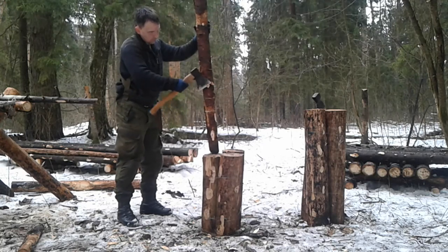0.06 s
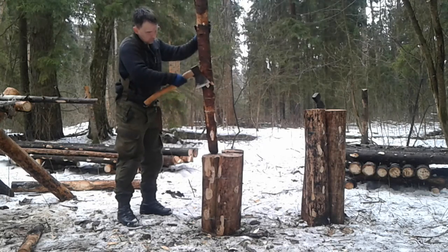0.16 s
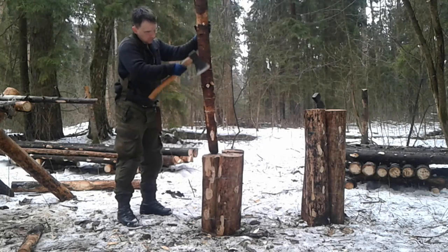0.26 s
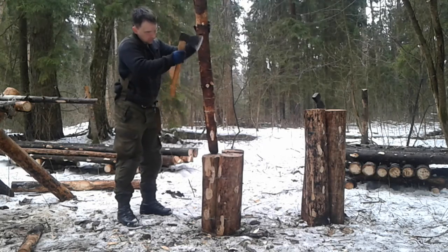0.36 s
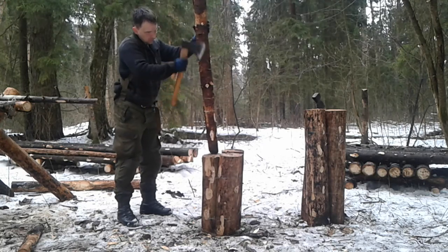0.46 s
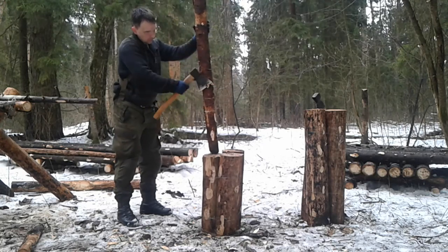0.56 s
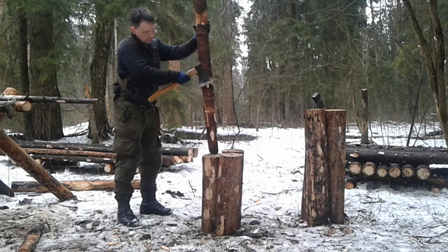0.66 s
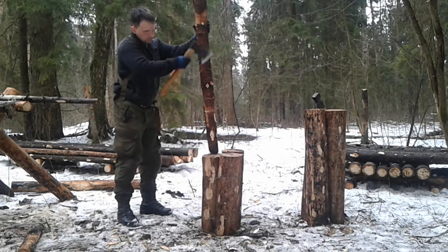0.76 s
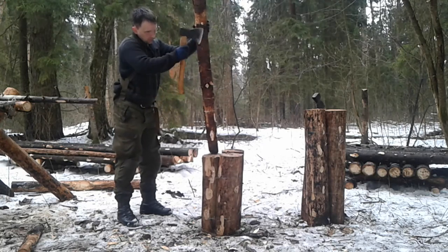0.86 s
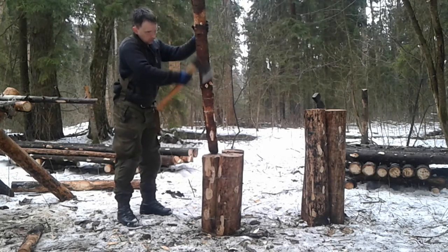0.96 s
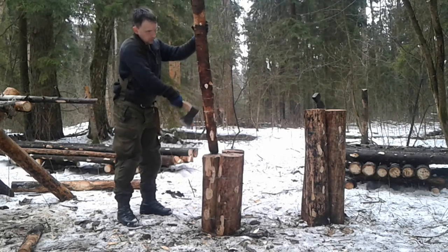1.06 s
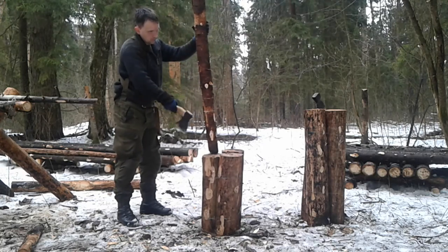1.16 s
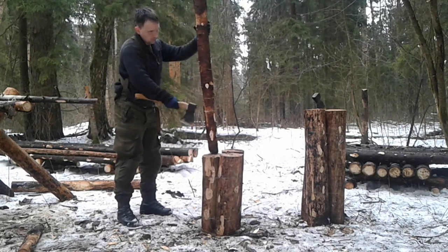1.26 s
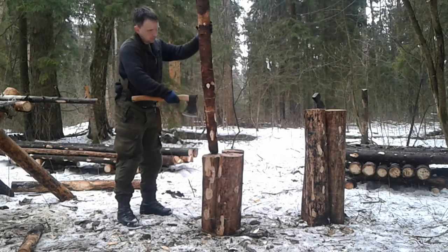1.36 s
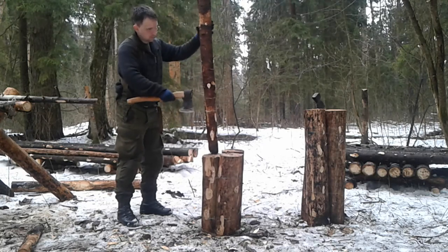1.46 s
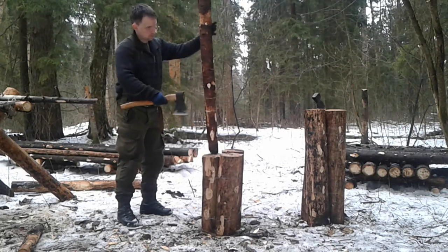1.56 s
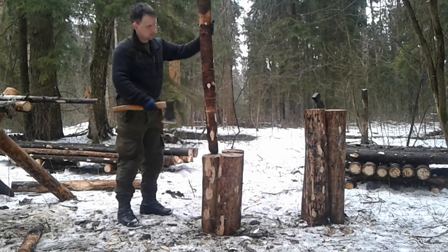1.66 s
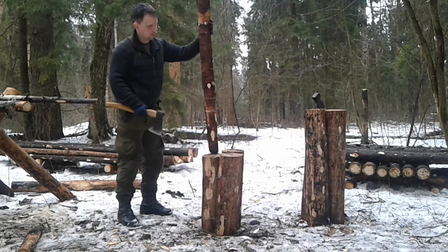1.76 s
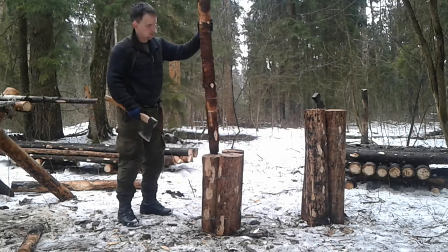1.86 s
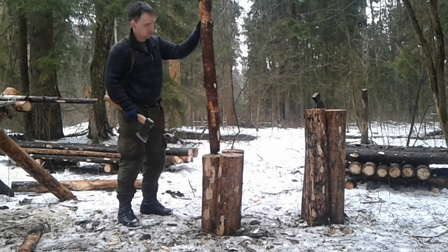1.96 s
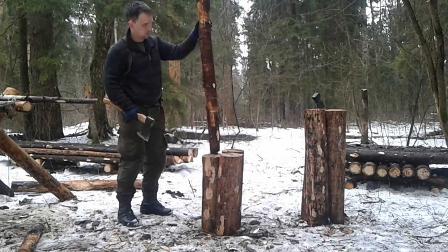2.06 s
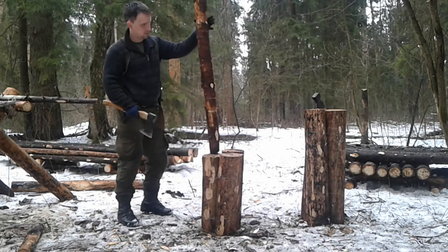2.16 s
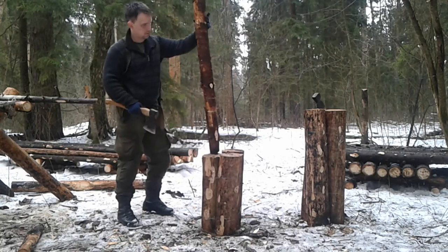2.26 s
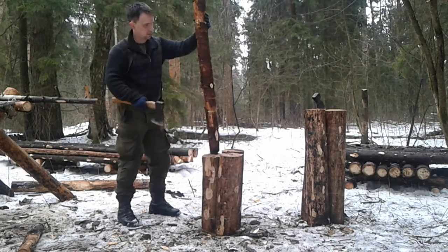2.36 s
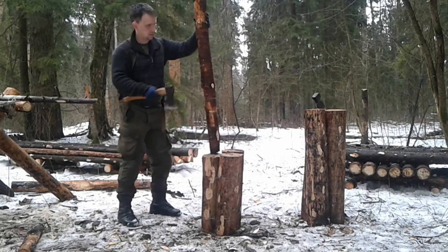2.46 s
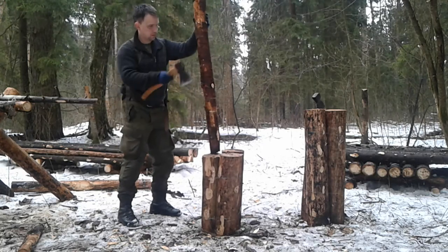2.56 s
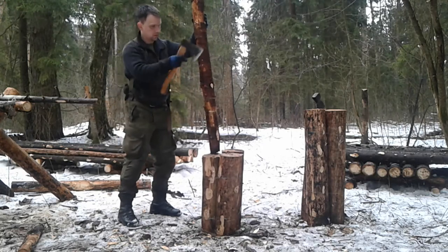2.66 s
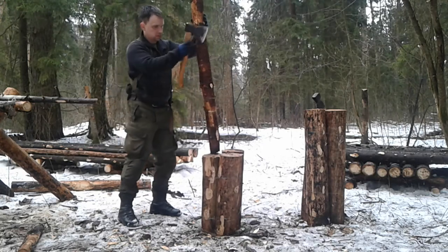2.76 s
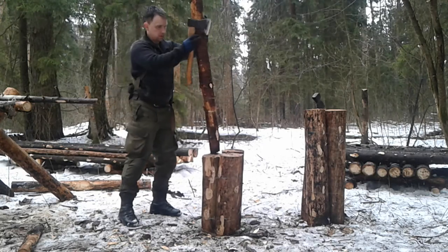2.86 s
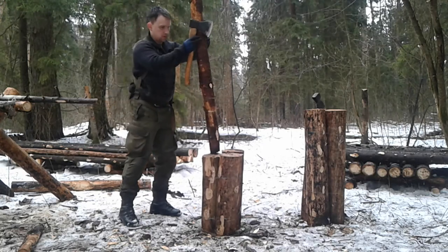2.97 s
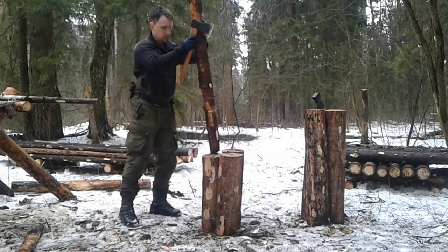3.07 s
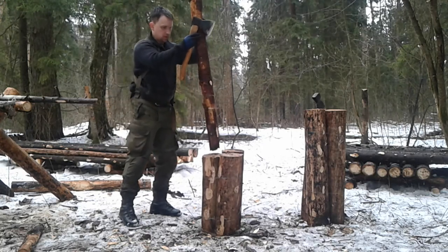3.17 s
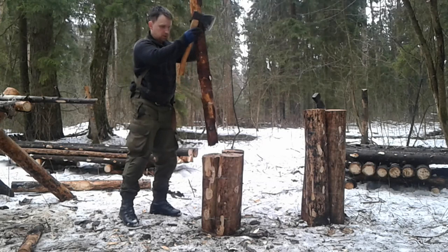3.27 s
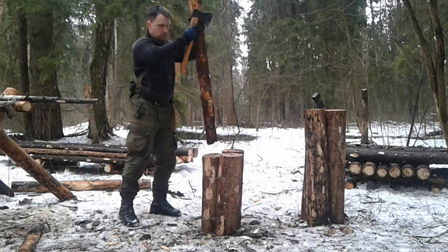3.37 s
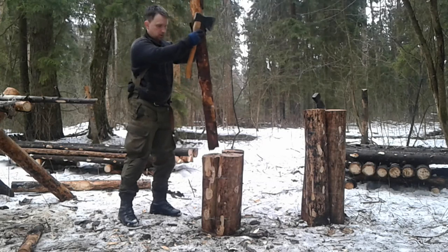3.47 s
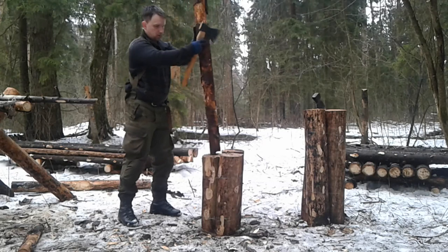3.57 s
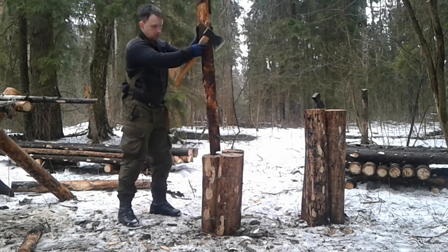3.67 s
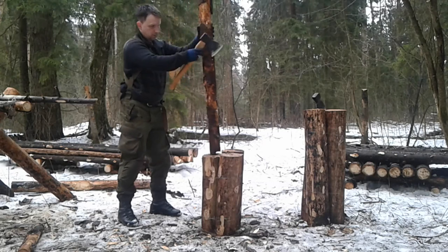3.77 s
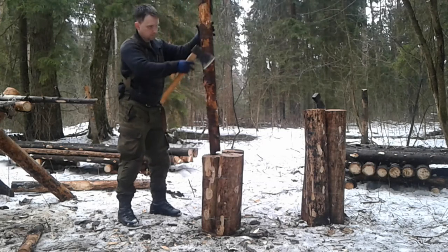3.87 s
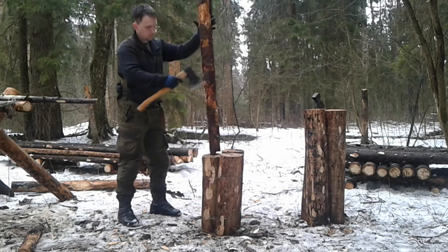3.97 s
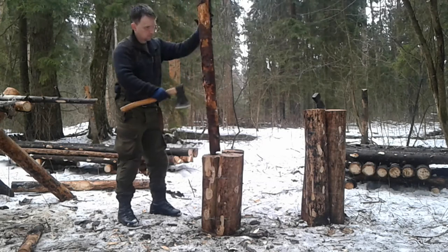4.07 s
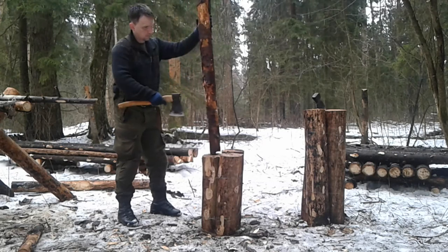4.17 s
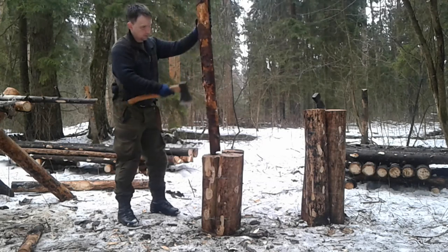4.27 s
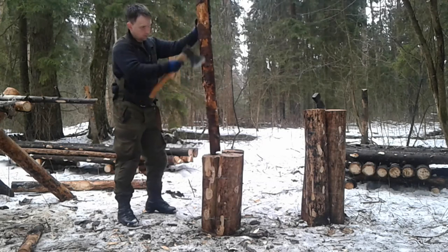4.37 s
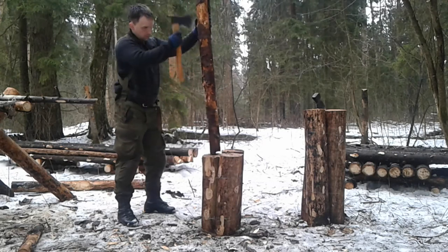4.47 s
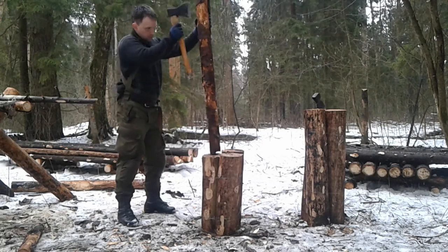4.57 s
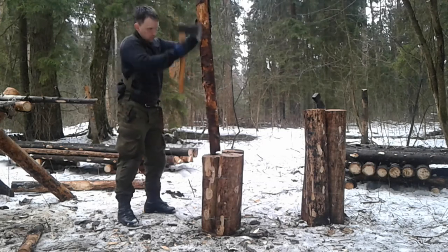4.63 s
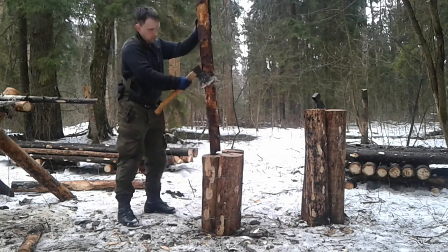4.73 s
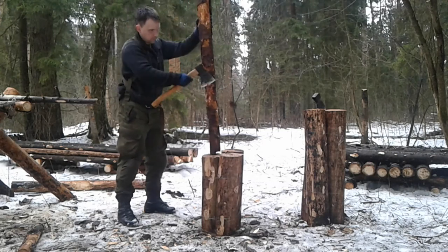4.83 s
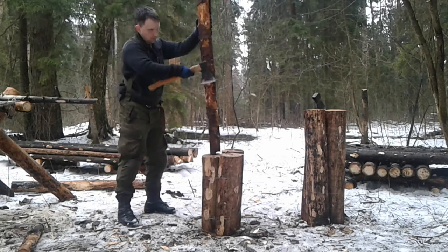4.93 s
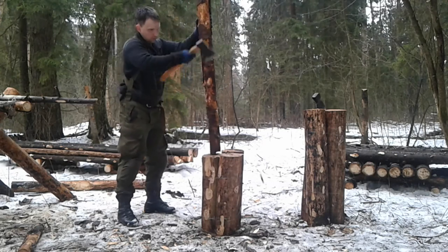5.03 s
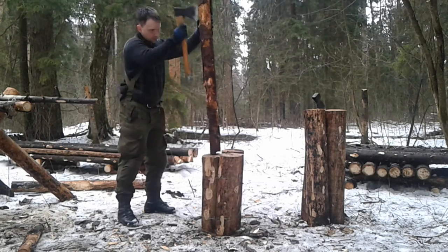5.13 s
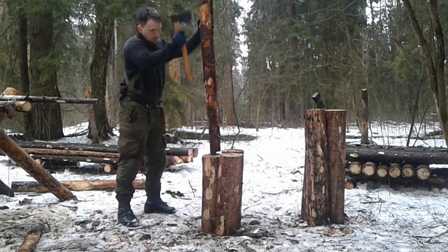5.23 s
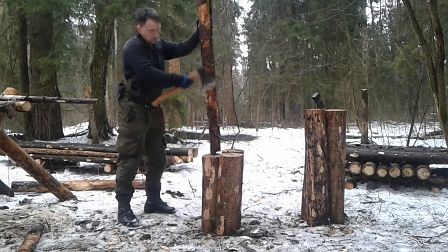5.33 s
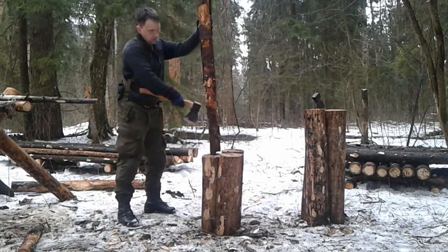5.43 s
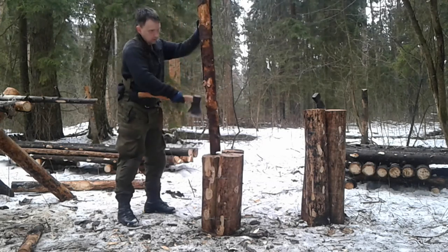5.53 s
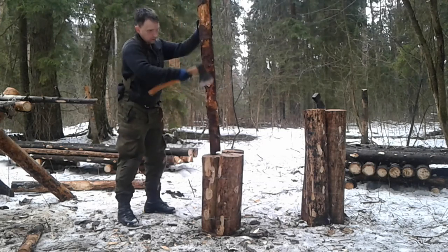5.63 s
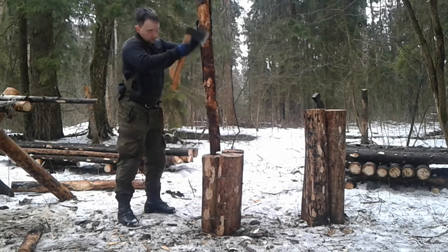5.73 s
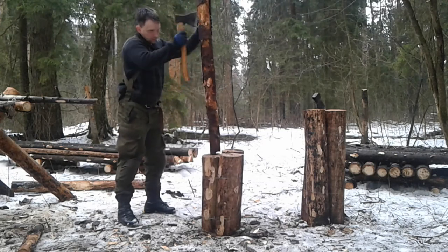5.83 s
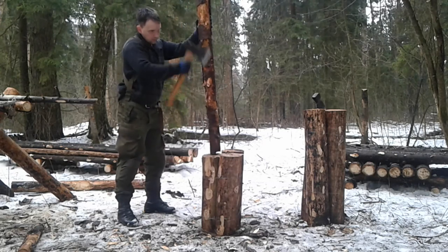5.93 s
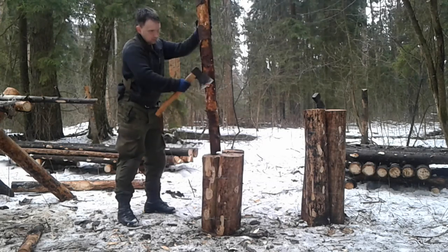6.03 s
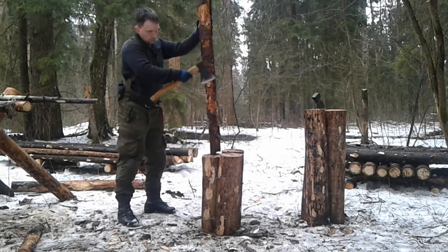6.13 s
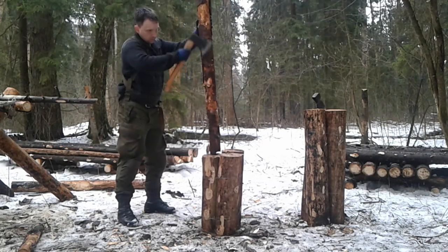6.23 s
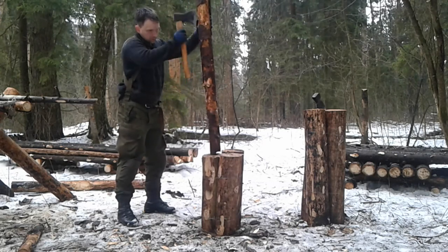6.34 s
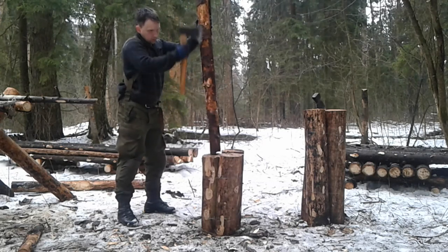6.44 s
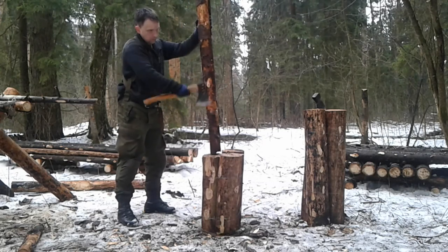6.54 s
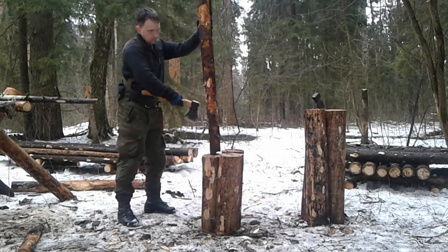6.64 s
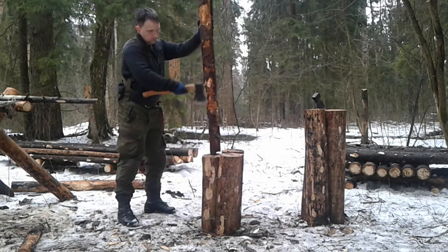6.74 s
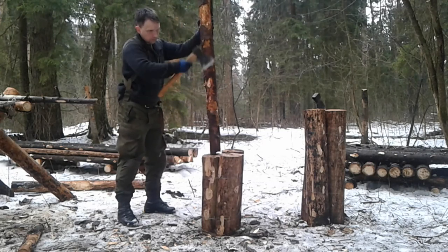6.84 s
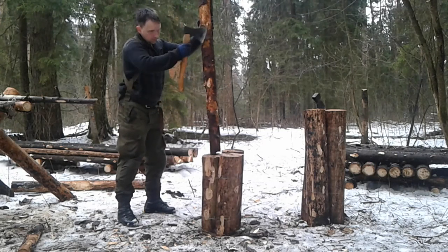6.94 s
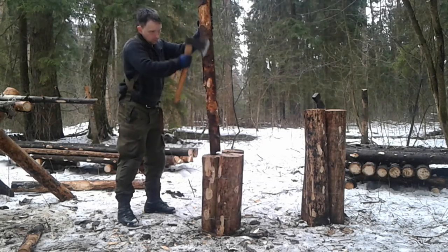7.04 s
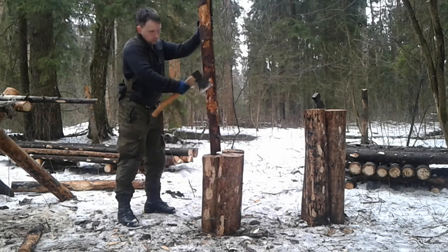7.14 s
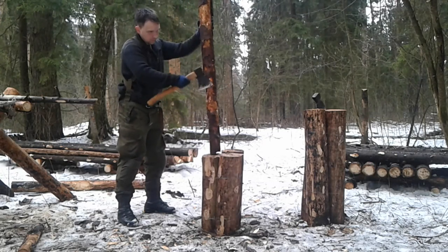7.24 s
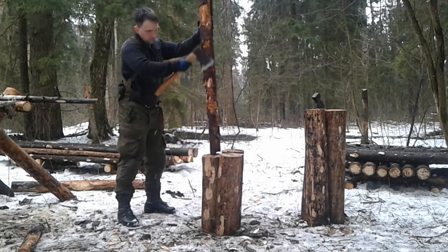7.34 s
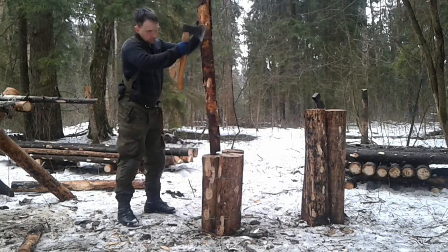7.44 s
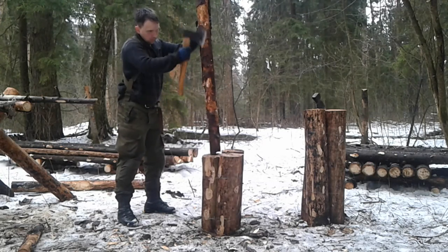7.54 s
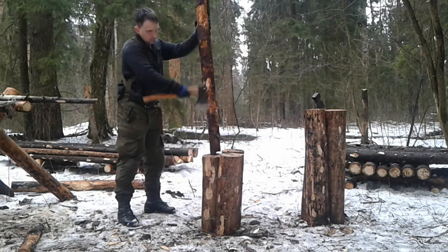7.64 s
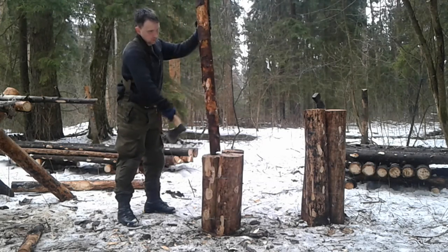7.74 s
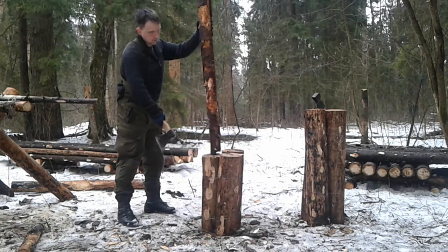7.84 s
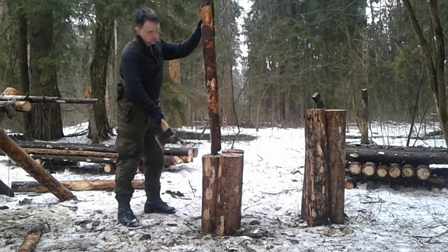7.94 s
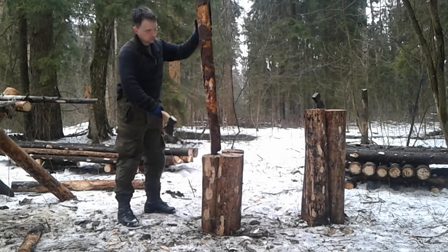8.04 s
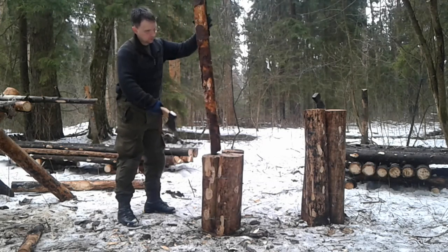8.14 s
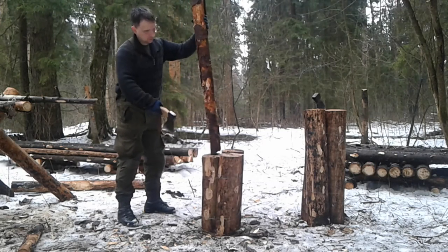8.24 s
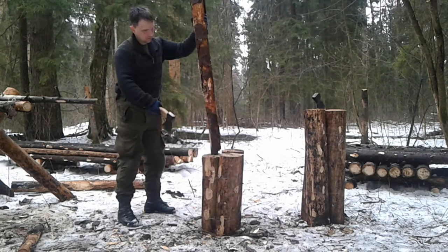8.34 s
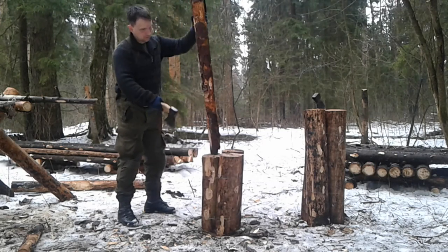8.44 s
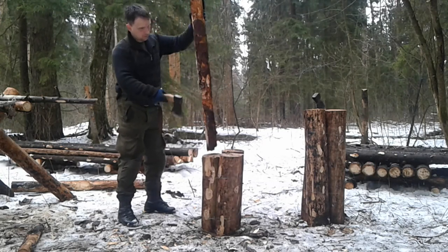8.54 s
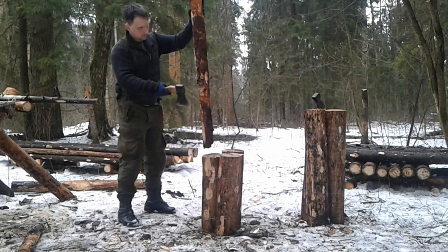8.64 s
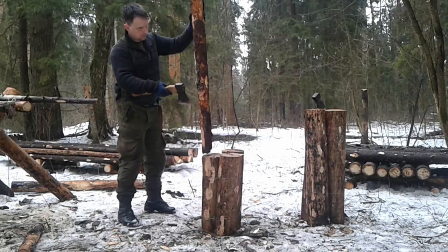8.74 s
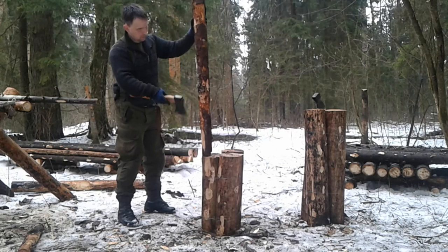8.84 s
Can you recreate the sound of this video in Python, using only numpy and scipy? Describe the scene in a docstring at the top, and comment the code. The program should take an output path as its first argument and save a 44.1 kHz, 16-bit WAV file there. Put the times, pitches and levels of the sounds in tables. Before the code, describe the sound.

Crisp axe chops into a standing log, three blows, a pause with a soft bump, then a quicker run with high metallic ringing and falling chips.

```python
"""A snowy forest: an axe hews an upright wooden pole in front of the microphone.
Each blow tears fibres (cracks through resonances), knocks the pole (struck modes) and sets the steel
head singing (damped modes and one long bending tone); the trunks scatter it back as a noise tail.
Chips patter down, cloth rustles, the pole bumps on its block once, the blade drags free in two tugs,
and a far steady rush of shaped noise lies under it all."""
import sys
import numpy as np
from scipy import signal
from scipy.fft import rfft, irfft, next_fast_len
from scipy.io import wavfile
from scipy.ndimage import uniform_filter1d, map_coordinates

SR = 44100
rng = np.random.default_rng(int(sys.argv[2]) if len(sys.argv) > 2 else 0)


def master(y):
    """Save y as 16-bit WAV."""
    cut = np.clip(np.atleast_2d(y).T, -1, 1)
    pcm = np.round(cut * 32767)  # scale
    wavfile.write(sys.argv[1], SR, pcm.astype(np.int16))


N = 392490
T = np.arange(N) / SR


def amp(db):
    """Amplitude factor of a level in dB."""
    return 10 ** (np.asarray(db) / 20)


def unit(x):
    """x scaled to rms 1."""
    return x / np.sqrt(np.mean(x ** 2) + 1e-20)


def along(points, hz):
    """Value at hz, read between (Hz, value) points on a log axis."""
    f, v = np.transpose(points)
    return np.interp(np.log(hz + 1), np.log(f + 1), v)


def level(rows):
    """Gain per sample from (s, dB) rows, silent outside them."""
    s, db = np.transpose(rows)
    return amp(np.interp(T, s, db, left=-200, right=-200))


def filtered(x, response):
    """x times a complex response of frequency."""
    m = next_fast_len(x.shape[-1] + 4096)
    spectrum = rfft(x, m) * response(np.fft.rfftfreq(m, 1 / SR))
    return irfft(spectrum, m)[..., :x.shape[-1]]


def resonances(modes):
    """Causal response of (Hz, width Hz, dB) resonances, added with alternating sign."""
    def response(f):
        return sum((-1) ** k * amp(db) * 1j * f * width / (hz * hz - f * f + 1j * f * width)
                   for k, (hz, width, db) in enumerate(modes))
    return response


def snaps(size, spread_db):
    """Dense tiny cracks of uneven size, rms 1."""
    return unit(rng.standard_normal(size) * amp(spread_db * rng.standard_normal(size)))


def clumps(rate, depth_db):
    """Gain of rms 1 that wanders between random levels, rate of them a second."""
    steps = rng.standard_normal(int(N / SR * rate) + 4)
    return unit(amp(depth_db * map_coordinates(steps, [T * rate])))


def gesture(s, rise, hold, fall_db, db):
    """Gain that rises, holds, then falls by fall_db a second."""
    past_hold = np.maximum(T - s - rise - hold, 0)
    return amp(db - fall_db * past_hold) * np.clip((T - s) / rise, 0, 1) ** 2


def ringing(modes, t, attack, scatter_db):
    """Damped (Hz, dB, t60 s) modes, each at a new strength."""
    t = np.maximum(t, 0)
    ring = sum(amp(db + scatter_db * rng.normal() - 60 * t / t60) * np.sin(2 * np.pi * hz * t)
               for hz, db, t60 in modes)
    return (1 - np.exp(-t / attack)) * ring


def add(track, s, x):
    """Mix x into the track at s seconds."""
    part = track[round(s * SR):][:len(x)]
    part += x[:len(part)]


# The far rush over time. Each row: time in seconds, level in dB rms.
RUSH_LEVEL = [(0.0, -57), (1.16, -56), (1.61, -57.5), (4.24, -57), (4.93, -55.5), (8.01, -55.5), (8.9, -57)]
# Its spectrum at the microphone. Each row: frequency in Hz, relative level in dB.
RUSH_SPECTRUM = [(20, -18.5), (35, -5.5), (60, 3.5), (86, -1), (237, -6.5), (300, -7), (660, -5),
                 (1100, -12.5), (2130, -24.5), (3400, -26), (7400, -34), (8300, -30.5), (10900, -43.5),
                 (15600, -35.5)]


def rush():
    """Far steady noise with faint patches in time and frequency."""
    z = signal.stft(rng.standard_normal(N), nperseg=512)[2]
    across_hz = uniform_filter1d(rng.standard_normal(z.shape), size=6, axis=0)
    patches = uniform_filter1d(across_hz, size=14, axis=1)
    noise = signal.istft(z * amp(0.4 * unit(patches)), nperseg=512)[1][:N]
    return level(RUSH_LEVEL) * unit(filtered(noise, lambda hz: amp(along(RUSH_SPECTRUM, hz))))


# The head rings free on its long mode until wood grips it again. Each row: start in seconds, end in
# seconds, level in dB, fade in dB per s, clang in dB above that level, t60 of the clang in seconds.
FREE_RINGS = [(0, 0.105, -70.5, 17, -30, .1), (1.12, 1.96, -46, 53.5, 17, .09),
              (5.091, 5.447, -62.5, 62, -30, .1), (5.494, 6.124, -37, 36.5, 10.5, .2),
              (6.648, 7.232, -46, 41.5, 10, .1), (7.748, 8.799, -34, 37, 0.5, .12)]
# The ringing head swings closer and away again. Each row: time in seconds, speed towards the
# microphone in m/s.
HEAD_SWING = [(1.19, .3), (1.43, 1.05), (1.65, .2), (5.52, -.55), (5.73, .8), (5.87, -.3), (6.08, .4),
              (6.7, -.4), (6.9, .45), (7.03, -.2), (7.2, .3), (7.9, -.15), (8.15, .9), (8.3, .35),
              (8.55, .2)]
# The head turns its quiet side this way (dip) or its broad side (swell). Each row: time in seconds,
# change in dB, half length in seconds.
HEAD_TURNS = [(1.418, -10, 0.02), (1.55, -14, 0.032), (5.7, -0.5, 0.021), (5.805, -6, 0.0058),
              (5.86, 5.5, 0.042), (6.046, -4, 0.027), (6.1, 2.5, 0.036), (6.676, 11.5, 0.016),
              (6.822, -10, 0.019), (6.956, -4, 0.014), (6.99, 6.5, .04), (7.821, -8, 0.0087),
              (7.855, -11, 0.015), (8.08, -2.5, 0.065), (8.191, -4, 0.038), (8.76, -11, 0.11)]
SING_HZ, SOUND_M_PER_S = 3061, 343


def singing():
    """The long steel mode: a clang, then a slow fade; the swing bends its pitch, the turns its level."""
    flutter_db = 0.91 * map_coordinates(rng.standard_normal(400), [T * 40])  # 40 random levels a second
    heard_hz = SING_HZ * (1 + np.interp(T, *np.transpose(HEAD_SWING)) / SOUND_M_PER_S)
    ring = np.zeros(N)
    for s, end, db, fade_db, clang_db, t60 in FREE_RINGS:
        since = np.abs(T - s)
        fade = amp(-fade_db * since)
        clang = amp(clang_db - 60 * since / t60)
        ring += (T >= s) * (T < end) * amp(db) * (fade + clang)
    facing_db = sum(db * np.exp(-((T - s) / half) ** 2) for s, db, half in HEAD_TURNS)
    gain = amp(flutter_db + facing_db) * uniform_filter1d(ring, size=60)
    return np.sqrt(2) * gain * np.sin(2 * np.pi * np.cumsum(heard_hz) / SR)


# The tearing wood near the cut. Each row: frequency in Hz, width in Hz, relative level in dB.
FIBRE_RESONANCES = [(2100, 4200, -12.5), (3466, 730, -5.5), (4310, 480, -5.5), (5070, 600, -4.5),
                    (6420, 370, -1.5), (7810, 870, 0), (8757, 590, 2), (9720, 1700, -23.5),
                    (15100, 1500, -12.5), (15400, 410, -24.5)]
TREBLE_FROM_HZ, TREBLE_FULL_HZ, NOTE_WIDTH_HZ = 3600, 5860, 260


def tearing(stroke, treble_db, chip_notes):
    """Cracks excite the fibres and two notes of the chip that splits off."""
    modes = [(hz, NOTE_WIDTH_HZ, db) for hz, db in chip_notes]
    for hz, width, db in FIBRE_RESONANCES:
        tilt_db = np.interp(hz, [TREBLE_FROM_HZ, TREBLE_FULL_HZ], [0, treble_db])
        modes.append((hz, width, db + tilt_db))
    return stroke * unit(filtered(snaps(SR, spread_db=0.5), resonances(sorted(modes))))


def reach(hz, centre_hz, octaves, db):
    """Gain that is db at the centre and 12 dB less the given octaves away."""
    return amp(db - 12 * (np.log2(hz / centre_hz) / octaves) ** 2)


# Bending modes of the pole. Each row: frequency in Hz, relative level in dB.
POLE_MODES = [(110, 0), (160, -4), (200, 0), (250, -5), (334, -3), (410, -5), (470, -3), (560, -3),
              (650, -4), (740, -3), (818, 0), (950, -8), (1100, -3), (1240, -2), (1340, -2), (1590, -6),
              (1730, -3), (1850, 0), (1960, -5)]
# Damping of green wood. Each row: frequency in Hz, t60 in seconds.
WOOD_DAMPING = [(110, .07), (200, .085), (500, .055), (1100, .035), (2000, .03)]
STOP_OVER_RISE = 1.4  # when the blade stops, in rise times


def knocked_pole(stroke, rise, parts, t):
    """Edge landing, tearing and blade stop push the pole's bending modes."""
    struck = []
    for hz, db in POLE_MODES:
        push_db = 20 * np.log10(sum(reach(hz, *part) for part in parts))
        struck.append((hz, db + push_db, along(WOOD_DAMPING, hz)))
    force = amp(-27) * stroke * rng.standard_normal(SR)
    force[0] -= .5  # the edge lands
    force[round(STOP_OVER_RISE * rise * SR)] -= 1  # the blade is stopped
    response = ringing(struck, t[:SR // 5], attack=.001, scatter_db=1.5)
    wood = signal.fftconvolve(force / np.linalg.norm(force), response)[:SR]
    # a thin pole radiates little deep bass
    return filtered(wood, lambda f: (1j * f / (85 + 1j * f)) ** 2)


# Short modes of the steel head. Each row: frequency in Hz, relative level in dB, t60 in seconds.
STEEL_MODES = [(5884, -6, .3), (6988, -14, .2), (8856, -2, .25), (11070, -26, .15), (12570, -17, .18)]


def rattling_head(rise, t):
    """Short steel modes, roughened because the wood grips the head unevenly."""
    rattle = unit(uniform_filter1d(rng.standard_normal(SR), size=200))
    return rattle * ringing(STEEL_MODES, t - rise, attack=.002, scatter_db=2)


# Echo from the trunks. Each row: frequency in Hz, t60 of its quick part in seconds.
TRUNK_ECHO = [(200, .2), (1000, 0.2), (2000, .45), (3700, 0.21), (6000, 0.33), (9000, 0.24), (15000, 0.083)]


def echo(x):
    """Scatter from the trunks: a fresh noise tail; near trunks answer briefly, far ones linger."""
    hz, t, z = signal.stft(rng.standard_normal(len(x)), SR, nperseg=256)
    t60 = along(TRUNK_ECHO, hz)[:, None]
    near = amp(-60 * t / t60)
    far = amp(-6.0) * amp(-24 * t / t60)
    tail = signal.istft(z * (near + far), SR, nperseg=256)[1]
    delayed = np.pad(x, (round(0.0074 * SR), 0))  # about 2.5 m of extra path
    return signal.fftconvolve(delayed, tail / np.linalg.norm(tail))[:len(x)]


# Blade contacts. Each row: start in seconds; the pole's thud, knock and click, each centre in Hz and
# level in dB; tearing level in dB, its treble in dB above that, rise in seconds, t60 in seconds;
# two notes of the chip, each in Hz and relative level in dB among the fibres; steel level in dB;
# echo level in dB.
BLADE_CONTACTS = [(0.1119, 130, -20.5, 495, -17, 1165, -26, -15, -13.5, 0.0061, 0.02, 3660, 0.5, 6290, -2, -58.5, -17),
                  (0.6628, 177, -26, 483, -22, 1845, -16.5, -13, -9.5, .005, 0.029, 3460, 7.5, 7880, 2, -72, -18),
                  (1.12, 200, -19, 606, -11.5, 1160, -12, -16, -6, 0.0014, 0.028, 5970, 1.5, 7950, -5, -29.5, -15.5),
                  (4.82, 296, -45, 790, -25.5, 1840, -19.5, -26.5, -11.5, 0.0051, 0.076, 3440, 1.5, 2954, -2.5, -52, -19.5),
                  (4.83, 180, -14.5, 448, -12.5, 1300, -12, -22.5, -7, 0.0034, 0.017, 5240, -2, 8810, -1, -45, -19.5),
                  (5.493, 128.3, -20, 520, -19, 1330, -16, -12.5, -7.5, .0024, 0.04, 5160, 2, 8220, 3.5, -27.5, -15),
                  (6.1199, 136, -17, 573, -10.5, 1210, -15, -15, -11.5, .0018, 0.019, 3360, 3.5, 8380, 3, -50, -17),
                  (6.647, 140, -27, 700, -26, 1750, -18, -11, -10.5, 0.0053, 0.02, 3380, 5, 8550, 2.5, -43, -15),
                  (7.23, 129, -23.5, 600, -15, 1837, -20.5, -15.5, -6, 0.0038, 0.032, 3680, 3, 5870, -2, -48, -15.5),
                  (7.7457, 267, -20, 680, -9.5, 1748, -15.5, -23, -11.5, .0014, 0.04, 4600, 1, 8640, -3, -35.5, -16)]
THUD_OCT, KNOCK_OCT, CLICK_OCT = 1, .8, .25  # reach of each among the modes, octaves
HOLD_S = .002  # of the tearing


def blows():
    """The edge knocks the pole and keeps shaking it while the fibres tear; the steel rings on."""
    out, t = np.zeros(N), np.arange(SR) / SR
    for (s, thud_hz, thud_db, knock_hz, knock_db, click_hz, click_db, tear_db, treble_db, rise, t60,
         note_hz, note_db, other_hz, other_db, steel_db, echo_db) in BLADE_CONTACTS:
        fall_db = -60 * np.maximum(t - rise - HOLD_S, 0) / t60
        stroke = np.minimum(t / rise, 1) ** 3 * amp(fall_db)
        chip_notes = [(note_hz, note_db), (other_hz, other_db)]
        parts = [(thud_hz, THUD_OCT, thud_db), (knock_hz, KNOCK_OCT, knock_db),
                 (click_hz, CLICK_OCT, click_db)]
        tear = amp(tear_db) * tearing(stroke, treble_db, chip_notes)
        wood = knocked_pole(stroke, rise, parts, t)
        steel = amp(steel_db) * rattling_head(rise, t)
        scattered = echo(tear + steel + amp(-3.0) * wood)  # snow swallows the duller part
        add(out, s, tear + wood + steel + amp(echo_db) * scattered)
    return out


# Cloth and crumbling bark. Each row: start in seconds, rise in seconds, hold in seconds, fall in
# dB per s, level of the crisp part in dB, dull part in dB above that.
RUSTLES = [(1.45, .04, 0.011, 220, -65, 0.5), (2.028, 0.0089, .005, 250, -67.5, 3.5),
           (2.21, .03, 0.022, 60, -77, 2), (2.5, 0.033, 0.025, 904, -56.5, -4),
           (3.139, 0.021, 0.0046, 200, -70, -4), (3.648, 0.015, 0.0063, 500, -57.5, 3),
           (3.677, 0.024, 0.063, 87, -68.5, 1), (3.714, 0.011, 0.0069, 400, -69.5, 9),
           (4.33, 0.023, .01, 501, -72, -3), (4.465, 0.053, .005, 400, -59, -2.1),
           (5.28, .03, 0.21, 305, -75, -17)]


def rustle():
    """A soft, broad crackle with a duller scraping part."""
    crackle = snaps(N, spread_db=5) * clumps(150, depth_db=2.5)
    crisp = unit(filtered(crackle, resonances([(8000, 3100, 12.5), (14000, 2100, -35.5)])))
    dull_modes = [(1490, 1100, 12.0), (2670, 3100, 9.5), (4625, 1400, -13.5)]
    dull = unit(filtered(crackle, resonances(dull_modes)))
    return sum(gesture(*shape) * (crisp + amp(dull_db) * dull) for *shape, dull_db in RUSTLES)


# The larger chips landing. Each row: start in seconds, level in dB, dull part in dB above that.
CHIP_LANDINGS = [(1.474, -43, -7), (1.49, -36.5, -11), (1.647, -59, 9), (1.966, -53, -9),
                 (2.0396, -42.5, -1), (3.026, -48, -11), (3.579, -46, -17), (3.768, -47, -15),
                 (3.7764, -53, -14), (3.84, -46.5, -1), (3.9225, -50.5, -31), (5.045, -43, 3.5),
                 (5.266, -34.5, -1.5), (5.3178, -49, -16), (5.3532, -49, -14), (5.3702, -40.5, -28),
                 (5.4081, -49, -26), (5.4316, -51, -17), (5.46, -44, -17), (5.7097, -44, 3),
                 (5.756, -37.5, -4), (5.8411, -46, 5), (5.8591, -54, 17), (5.884, -48, -1),
                 (5.98, -39.5, -8), (6.088, -47, -4), (6.5892, -28, -8), (6.7794, -39, -16),
                 (6.8317, -29, -15), (7.043, -38, -15), (7.085, -53, -18), (7.157, -46.5, -13),
                 (7.597, -48.5, -21), (7.8141, -45, -9), (7.8932, -42, 3.5), (7.9094, -45, -4),
                 (7.9622, -38.5, -23), (8.139, -43, -11.5), (8.2167, -50, -14)]
# Fall of a crumb: shortest and longest, in seconds.
CRUMB_FALL = (0.3, .6)
CRUMBS, CRUMB_DB, CRUMB_SPREAD_DB, CRUMB_DULL_DB = 5, -53, 1, -14  # each time the head pulls free
CHIP_T60_S = .012


def chips():
    """Each chip is a short dry tick with a duller body; crumbs follow when the head pulls free."""
    out, t = np.zeros(N), np.arange(SR // 10) / SR
    crisp = resonances([mode for mode in FIBRE_RESONANCES if mode[0] > 4000])
    body = resonances([(1877, 520, 0)])
    crumbs = [(s + rng.uniform(*CRUMB_FALL), rng.normal(CRUMB_DB, CRUMB_SPREAD_DB), CRUMB_DULL_DB)
              for s, *_ in FREE_RINGS if s > 0 for _ in range(CRUMBS)]
    decay = (1 - np.exp(-t / 0.0012)) * amp(-60 * t / CHIP_T60_S)
    for s, db, dull_db in CHIP_LANDINGS + crumbs:
        tick = unit(filtered(snaps(len(t), spread_db=6.5), crisp))
        dull = unit(filtered(snaps(len(t), spread_db=1.0), body))
        add(out, s, amp(db) * decay * (tick + amp(dull_db) * dull))
    return out


# The pole drops on its block. Each row: start in seconds, level in dB, t60 in seconds.
POLE_BUMP = [(3.667, -29, 0.09)]


def bump():
    """A soft contact: only the lowest modes of the pole answer."""
    out, t = np.zeros(N), np.arange(SR // 2) / SR
    for s, db, t60 in POLE_BUMP:
        low_modes = [(hz, mode_db, t60) for hz, mode_db in POLE_MODES[:3]]
        add(out, s, -amp(db) * ringing(low_modes, t, attack=.002, scatter_db=1))
    return out


# The blade drags free of the cut in two tugs. Each row: start in seconds, rise in seconds, hold in
# seconds, fall in dB per s, level in dB.
DRAG_TUGS = [(5.082, 0.0055, .002, 900, -46.5), (5.109, 0.01, 0.03, 1500, -43)]


def drag():
    """Steel scrapes on fibres and rings faintly as it comes free."""
    scrape = snaps(N, spread_db=5) * clumps(200, depth_db=3)
    grit = unit(filtered(scrape, resonances([(2190, 1300, 4.8)] + FIBRE_RESONANCES[1:])))
    out = sum(gesture(*tug) for tug in DRAG_TUGS) * grit
    t = np.arange(SR // 2) / SR
    faint_db = [-75, -52.5, -66, -70, -64]  # one for each steel mode
    faint = [(hz, db, t60) for (hz, _, t60), db in zip(STEEL_MODES, faint_db)]
    add(out, 5.146, ringing(faint, t, attack=.003, scatter_db=1))
    return out


def scene():
    """All sources as they reach the microphone, one channel."""
    return (blows() + singing() + chips() + drag() + rustle() + bump() + rush())[None]


BASS_CUT_HZ, TOP_HZ = 58, 16000


def record(dry):
    """The microphone drops the deepest bass and fades out the treble around its band limit."""
    def microphone(hz):
        f = hz / BASS_CUT_HZ
        bass_cut = ((1j * f) ** 2 / (1 + np.sqrt(2) * 1j * f - f ** 2)) ** 2
        return bass_cut * np.clip((TOP_HZ + 800 - hz) / 1100, 0, 1) ** 3
    return filtered(dry, microphone)


dry = scene()
out = record(dry)
master(out)
```